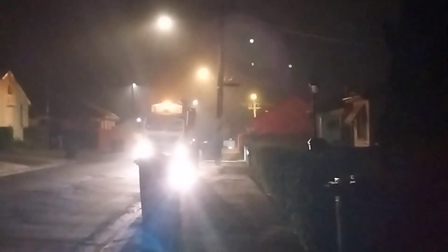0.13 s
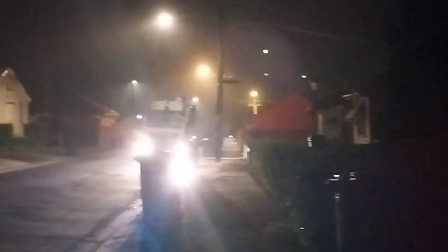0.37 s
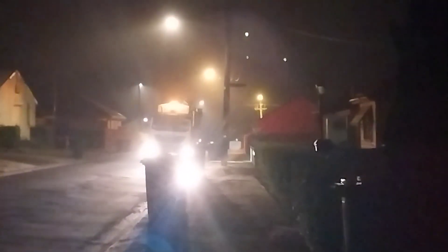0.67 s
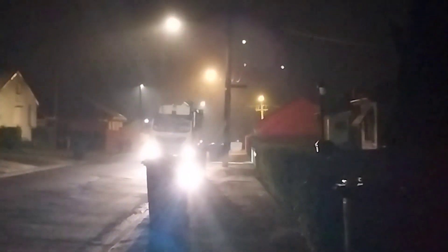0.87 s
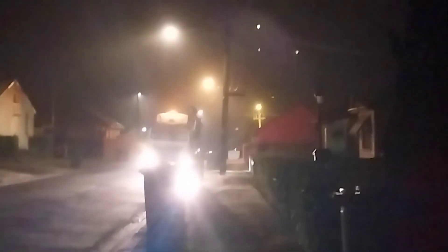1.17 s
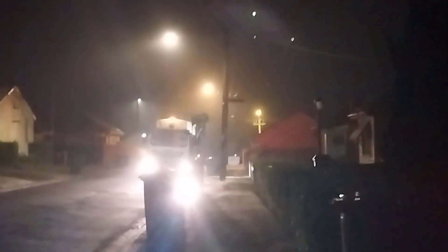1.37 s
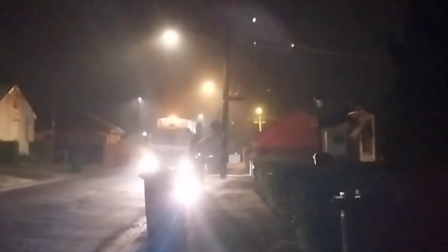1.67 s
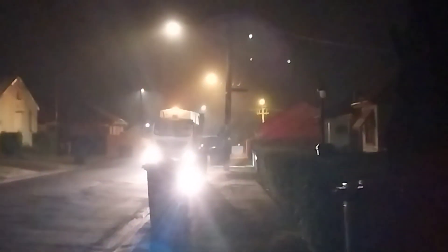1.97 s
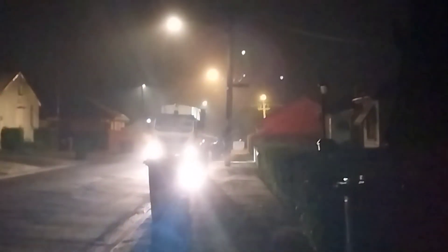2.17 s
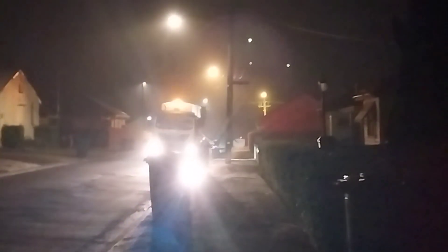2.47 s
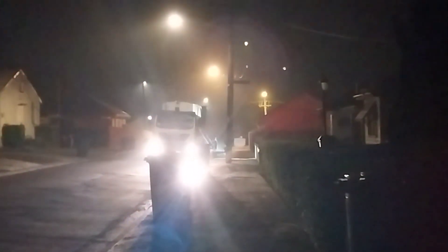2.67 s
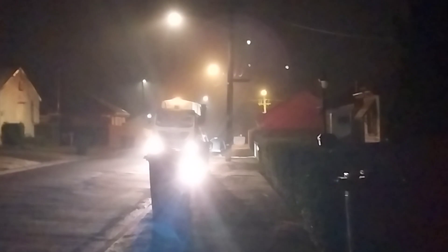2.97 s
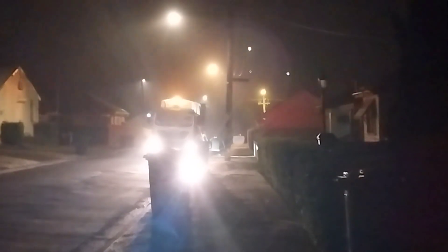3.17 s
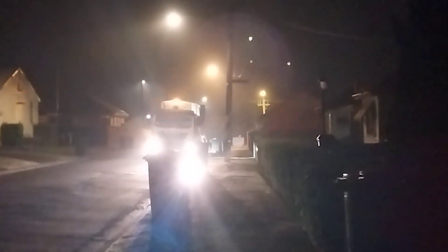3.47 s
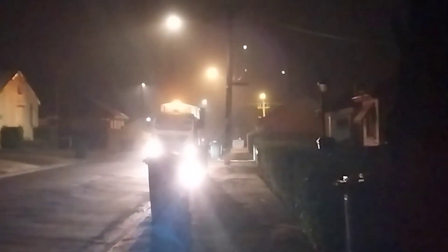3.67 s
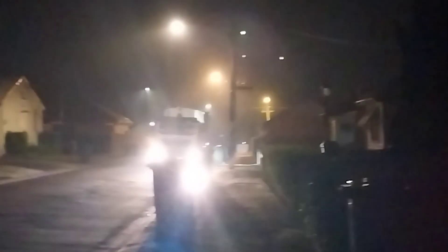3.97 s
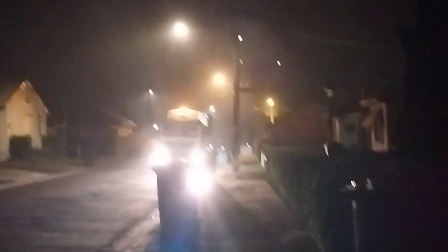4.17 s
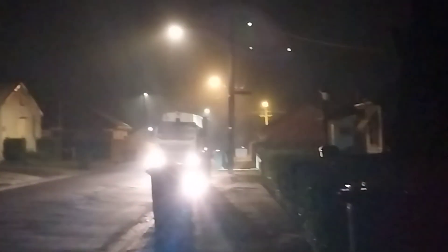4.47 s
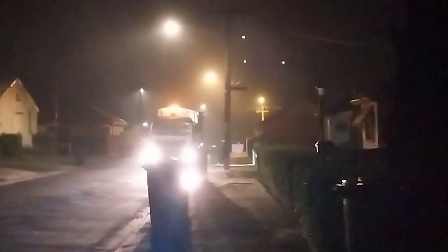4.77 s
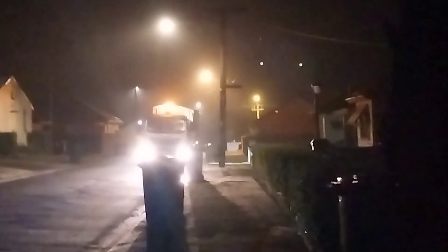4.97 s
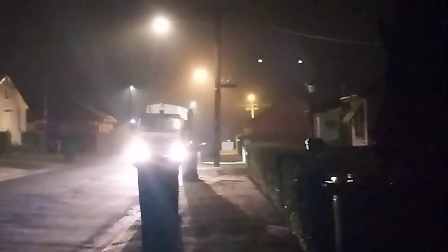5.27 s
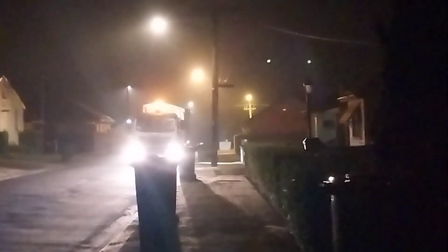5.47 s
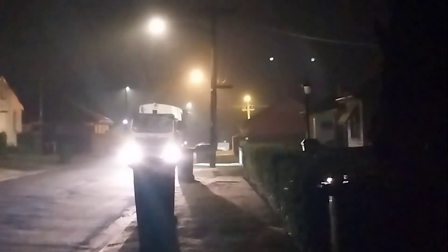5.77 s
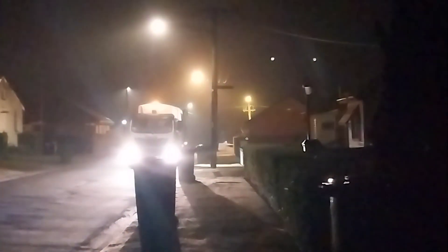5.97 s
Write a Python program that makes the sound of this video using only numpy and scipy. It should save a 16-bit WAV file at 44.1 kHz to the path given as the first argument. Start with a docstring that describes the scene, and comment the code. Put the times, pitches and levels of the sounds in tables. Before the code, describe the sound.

A garbage truck idles some way down a street, its diesel rumbling and clattering. The lift knocks a bin against the steel hopper in a quick run of booms, clanks and rattles. A pump hums through a few more knocks, ending in the loudest bang. The air brake gives a short hiss, and the engine revs up with a faint rising turbo whistle. House fronts add a brief echo.

```python
"""Night street, a refuse truck some way off. Its six-cylinder diesel idles: exhaust tones over rumble,
clatter and hiss. The lift bangs bins against the steel hopper; panels boom, the arm rings, loose parts
rattle, the pump hums. The air brake vents, the engine revs up and its turbo whistles.
Far traffic lies underneath; house fronts echo it all."""
import sys
import numpy as np
from scipy import signal
from scipy.fft import rfft, irfft, next_fast_len
from scipy.io import wavfile
from scipy.ndimage import uniform_filter1d

SR = 44100
rng = np.random.default_rng(int(sys.argv[2]) if len(sys.argv) > 2 else 0)


def bounce(signal):
    """Save signal as a 16-bit WAV file at the path given by the first command-line argument."""
    frames = np.transpose(np.atleast_2d(signal))
    limited = np.clip(frames, -1, 1)
    pcm = np.round(limited * 32767).astype(np.int16)
    wavfile.write(sys.argv[1], SR, pcm)


N = 269451

# engine speed (time [s], firing rate [Hz])
FIRING_RATE = [(0, 43.75), (1.3, 42.61), (3.85, 42.23), (4.16, 45.86), (4.51, 61.76), (4.69, 66.75),
               (4.99, 73.45), (5.22, 75.84), (5.59, 80.56), (6.11, 89.72)]
# exhaust orders 1-3 (idle level [dB], rise with speed [dB/oct])
EXHAUST_ORDERS = [(-42, 15), (-58, 30), (-44.5, 22)]
# pipe and street lift or cancel those orders (frequency [Hz], gain [dB])
PIPE_RESPONSE = [(45, 0), (61.5, 1.5), (64.8, -13), (68, 0.1), (72, 4), (78, -6), (82, -14), (86, -3),
                 (92, 0.1), (130, 0.1), (142, -7), (165, -8), (180, -3), (187, -6), (192, 8), (199, 7),
                 (204, -6), (210, -2), (218, 3), (226, -1), (231, -10), (237, 3), (249, 7), (256, 4),
                 (259.5, -7), (265, 2.5)]
# rumble, clatter, hiss, top hiss (idle level [dB], rise with speed [dB/oct], share of the swell [-])
ENGINE_LAYERS = [(-41, 12, 1.35), (-44, 8, 0.83), (-55.5, 8.5, 0.9), (-74, 11, 0.79)]
# swell and dip of the engine's rumble, clatter and hiss (time [s], gain [dB])
NOISE_SWELL = [(0, 1.7), (.44, 4), (1.05, 1.3), (2.9, 2.3), (3.52, -1), (4.17, -0.5), (4.32, 0.5), (4.7, 1)]
# clatter spectrum (frequency [Hz], density [dB])
CLATTER_SPECTRUM = [(190, -32), (330, -6), (409, -15.5), (476, -7.5), (525, -9.5), (706, -4), (948, -14.5),
                    (1060, -7.5), (1250, -14), (1380, -14), (1610, -11), (1810, -18.5), (2070, -16),
                    (2800, -27), (3640, -42), (6160, -120)]
# engine casing modes (frequency [Hz], decay rate [1/s], level [dB])
CASING_MODES = [(571.6, 31, 0.5), (745, 6.9, 0.5), (1063, 28, -6), (1234, 23, -0.5), (1680, 150, -3)]
# engine airflow spectrum (frequency [Hz], density [dB])
HISS_SPECTRUM = [(1530, -24), (2600, -1.5), (3300, -4.5), (3670, -2), (4660, -1.5), (4840, -3.5),
                 (5260, -0.5), (5880, -7), (7200, -12.5), (8740, -21.5), (10600, -28), (12800, -26),
                 (13800, -31.5), (15600, -42)]
# bin blows (time [s], boom [dB], boom tilt [dB/oct], clank [dB], clank pitch [Hz], crack [dB],
# rattle [dB])
BIN_BLOWS = [(0.09, -26, -15, -31, 740, -47, -52), (0.213, -23, -1, -32.5, 850, -49, -40.5),
             (0.254, -20, 9.5, -33, 1140, -43, -43), (0.275, -27, 10, -29.5, 1650, -48, -39),
             (0.312, -20.5, -9, -40, 2150, -53, -40.5), (0.415, -39, 10, -34, 1700, -42, -38),
             (0.434, -22, -6, -40, 745, -60, -58), (0.519, -20.5, 4, -35, 1090, -50, -45),
             (0.595, -29.5, -1, -33.5, 2150, -42, -36), (0.662, -24.5, 11, -46, 1085, -60, -58),
             (0.722, -31, 0, -34, 744, -44, -44), (0.752, -30, 2, -50, 742, -62, -55),
             (1.201, -34, 7, -23, 890, -44.5, -40), (1.267, -34, -3, -43, 745, -54, -44),
             (1.782, -27, 18, -38, 2150, -46, -39), (2.203, -23.5, -9, -37, 1270, -62, -44),
             (2.21, -24, -4, -24.5, 1890, -34, -37), (2.221, -22.5, 13, -28, 1760, -50, -52),
             (2.272, -25.5, 9, -46, 755, -62, -39.5), (3.029, -24, -8, -33, 1240, -59, -43.5),
             (3.061, -13.5, -7, -38, 1240, -46.5, -37.5), (3.093, -1.5, 6, -26, 1210, -41.5, -31.5),
             (3.149, -17, 2, -36, 740, -72, -59), (3.197, -11.5, 6, -40, 750, -47.5, -40.5),
             (3.255, -20, 3, -49, 1610, -61, -51), (3.3, -22, -8, -56, 1610, -65, -54),
             (3.419, -26, -7, -43, 1610, -53, -57), (3.726, -29.5, 17.5, -35, 1440, -46, -42),
             (4.082, -31, -6, -39, 740, -66, -44), (4.209, -39, -3, -45, 1250, -59, -43.5),
             (4.282, -28, -6, -37, 740, -48, -48), (4.327, -40.5, 1, -44, 1250, -48, -62),
             (4.363, -27, 26, -33.5, 1600, -43, -44.5)]
# hopper panel modes (frequency [Hz], level [dB], t60 [s])
HOPPER_MODES = [(55.5, -13, 0.35), (85, -34.5, 0.26), (104.3, -10, 0.96), (120.2, 2.5, 0.4),
                (137.3, -7, 0.95), (172.3, -3, 0.73), (209.6, 0.5, 0.15), (226.6, -3.5, 0.31),
                (240.6, -2, 0.096), (277.5, -12, 0.23), (401, -19, 0.1), (468, -17, 0.079),
                (515, -25, 0.068)]
# steel lift arm modes (frequency [Hz], level [dB], t60 [s])
ARM_MODES = [(740, -8, .07), (888, 2, .08), (1090, 3, .07), (1253, -3, .1), (1620, 1, .11), (1760, -4, .07),
             (2150, 0, .09), (2320, -5, .06), (2930, -13, .08), (3580, -13, .06), (4130, -11, .08)]
# brake vent, then a short spit (time [s], level [dB], opening [s], hold [s], fall [dB/s],
# low edge [Hz], high edge [Hz])
BRAKE_VENTS = [(3.572, -46.5, 0.039, 0.083, 85, 3200, 17000), (4.352, -58.5, .008, .005, 598, 11000, 13400)]
# brake air spectrum (frequency [Hz], density [dB])
VENT_SPECTRUM = [(1760, -47), (3000, -12), (4060, -0.5), (4570, -3), (4960, 2.5), (6270, -5), (7850, -3.5),
                 (8200, -9.5), (10700, -14), (11100, -4.5), (12900, -6.5), (14000, -14), (15600, -13)]
# turbo spool-up (time [s], pitch [Hz])
TURBO_PITCH = [(4.3, 6500), (4.9, 9350), (5.2, 10800), (5.55, 11900), (6.11, 14250)]
# echo spectrum (frequency [Hz], side minus mid [dB])
ECHO_WIDTH = [(60, -18), (200, -20), (400, -14.5), (700, -10), (1290, -4), (2380, -0.5), (4400, -2.5),
              (8120, 0.5), (15000, 0)]
# stereo balance (frequency [Hz], left minus right [dB])
BALANCE = [(60, 1), (110, -1), (200, -1), (380, -1), (700, -1), (1290, -5), (2380, 1), (4400, -1.5),
           (8120, -0.5), (15000, -3.5)]

IDLE_HZ = 42.5
CLANK_CONTACT_S, OFF_PITCH_MAX_DB = 0.0035, 9.5
RATTLE_RISE_S, RATTLE_FALL_S = 0.0032, 0.056
SHUDDER_RE_BOOM_DB, SHUDDER_RISE_S, SHUDDER_FALL_S = -15, 0.011, 0.089
PUMP_HZ, PUMP_DB, PUMP_ON_S, PUMP_OFF_S, PUMP_RAMP_S = 141.1, -40.5, 1.76, 3.2, 0.27
SEEP_DB, SEEP_FALL_DB_S = -23.5, 33
TURBO_DB, TURBO_LOUDEST_HZ, TURBO_FALL_DB_OCT = -67.5, 11700, 33
LOW_CUT_HZ, HIGH_CUT_HZ = 35, 15740


def undb(db):
    """Decibels to gain."""
    return 10 ** (np.asarray(db) / 20)


def peak(x):
    """Scale to peak 1."""
    return x / np.abs(x).max()


def curve(table):
    """A (time, value) table, one value a sample."""
    return np.interp(np.arange(N) / SR, *np.transpose(table))


def colour(x, table):
    """Filter by (frequency [Hz], gain [dB]) points on a log axis."""
    hz, db = np.transpose(table)
    mirrored_end = (2 * x[-1] - x[-2:-4098:-1]) * np.hanning(8192)[4096:]
    size = next_fast_len(N + SR // 4)
    bin_hz = np.arange(size // 2 + 1) * SR / size
    gain = undb(np.interp(np.log(bin_hz + 1), np.log(hz + 1), db))
    return irfft(rfft(np.concatenate([x, mirrored_end]), size) * gain, size)[:N]


def band(x, lo_hz, hi_hz):
    """Band-pass, scaled to rms 1."""
    sos = signal.butter(3, [lo_hz, min(hi_hz, 0.45 * SR)], "band", fs=SR, output="sos")
    y = signal.sosfilt(sos, x)
    return y / np.sqrt(np.mean(y ** 2))


def ring(x, hz, t60_s):
    """One decaying mode driven by x."""
    pole = np.exp(2j * np.pi * hz / SR - np.log(1000) / (t60_s * SR))
    return signal.lfilter([1], [1, -pole], x).imag


def walk(rate_hz):
    """Random steps, smoothed twice."""
    hold = int(SR / rate_hz)
    steps = np.repeat(rng.standard_normal(N // hold + 1), hold)
    return 1.27 * uniform_filter1d(uniform_filter1d(steps, hold), hold)[:N]


def tone(hz, rms_db):
    """Sine on a moving pitch."""
    return np.sqrt(2) * undb(rms_db) * np.sin(2 * np.pi * np.cumsum(hz) / SR)


def exhaust(firing_hz, speed_oct, rumble_db, clatter_db):
    """Firing harmonics sweep through the pipe response; unequal cylinders add weak half orders."""
    out = 0
    for order, (idle_db, rise_db_oct) in enumerate(EXHAUST_ORDERS, 1):
        hz = order * firing_hz
        pipe_db = np.interp(hz, *np.transpose(PIPE_RESPONSE))
        out += tone(hz, idle_db + rise_db_oct * speed_oct + pipe_db + 0.72 * walk(10))
    for order in (1.5, 2.5):
        out += tone(order * firing_hz, rumble_db - 17.5 + 3 * walk(8))
    return out + tone(6 * firing_hz, clatter_db - 13 + 3 * walk(8))  # shows under load


def engine():
    """Diesel: exhaust, body rumble, and casing clatter and air hiss that puff once a firing."""
    firing_hz, swell_db = curve(FIRING_RATE), curve(NOISE_SWELL)
    speed_oct = np.log2(firing_hz / IDLE_HZ)
    rumble_db, clatter_db, hiss_db, top_db = (
        idle_db + rise_db_oct * speed_oct + share * swell_db
        for idle_db, rise_db_oct, share in ENGINE_LAYERS)
    tones = exhaust(firing_hz, speed_oct, rumble_db, clatter_db)
    firing_phase = np.cumsum(firing_hz) / SR % 1
    puff = 0.83 + 0.21 * np.exp(-firing_phase / 0.34)
    casing = sum(undb(db) * ring(rng.standard_normal(N), hz, 6.9 / decay) * np.sqrt(decay)
                 for hz, decay, db in CASING_MODES)
    waver_db = 0.5 * walk(5.3)
    noise = rng.standard_normal(N)

    deep = band(noise, 74.3, 113.6) * undb(-6.5 - 2.2 * speed_oct)
    growl = band(noise, 300, 350.5) * undb(-15.5 + 4.2 * speed_oct)
    rumble = deep + band(noise, 139.5, 256.2) + growl
    rumble *= np.hypot(undb(rumble_db), body_shudder()) * undb(1.2 * walk(28))

    clatter = band(colour(rng.standard_normal(N), CLATTER_SPECTRUM), 205, 4200)
    clatter += 0.47 * band(casing, 380, 2900)
    clatter += band(noise, 442, 820) * undb(-22.5 + 16.3 * speed_oct)  # block growls under load
    clatter *= puff * undb(clatter_db + waver_db)

    air = colour(rng.standard_normal(N), HISS_SPECTRUM)
    hiss = band(air, 2870, 10260) * undb(hiss_db) + band(air, 9880, 21000) * undb(top_db)
    hiss *= puff * undb(waver_db + 0.5 * walk(31))
    return tones + rumble + clatter + hiss


def far_traffic():
    """Steady low rumble of distant traffic."""
    return band(rng.standard_normal(N), 25, 65) * undb(-53.5)


def hopper_boom(t, noise, tilt_db_oct):
    """A bin hits the panels; its shaking load keeps them going."""
    load = 0.7 * noise * (1 - np.exp(-t / 0.006)) * np.exp(-t / 0.077)
    shove = load - 2 * np.exp(-((t - 0.006) / 0.0026) ** 2)  # slow push on the large panels
    rim_chatter = load - sum(size * np.exp(-((t - at_s) / 0.00061) ** 2)
                             for at_s, size in ((0.002, 2.4), (0.0062, 3), (0.0104, 0.76)))
    boom = 0
    for hz, db, t60_s in HOPPER_MODES:
        spot_db = 2 * rng.standard_normal() + tilt_db_oct * np.log2(hz / 170)  # each lands elsewhere
        boom += undb(db + spot_db) * ring(rim_chatter if hz > 160 else shove, hz, t60_s)
    return peak(band(boom, 63, 600))  # panels radiate no deep bass


def arm_clank(t, noise, pitch_hz):
    """Brief contact rings the steel arm, favouring modes near the struck part's pitch."""
    scrape = (noise * t * np.exp(-t / CLANK_CONTACT_S))[:SR // 5]
    clank = 0
    for hz, db, t60_s in ARM_MODES:
        off_pitch_db = min(45 * abs(np.log2(hz / pitch_hz)), OFF_PITCH_MAX_DB)
        clank += undb(db - off_pitch_db) * peak(ring(band(scrape, 0.7 * hz, 1.4 * hz), hz, t60_s))
    return peak(clank)


def bin_blows():
    """Each blow booms, clanks, cracks and sets loose parts rattling."""
    out = np.zeros(N + SR)
    t = np.arange(SR // 2) / SR
    crack_rise = 1 - np.exp(-(t / 0.003) ** 2)  # blurred by distance
    crack_fall = np.exp(-t / 0.006) + 0.25 * np.exp(-t / 0.07)
    rattle_shape = (1 - np.exp(-t / RATTLE_RISE_S)) * np.exp(-t / RATTLE_FALL_S)
    for at_s, boom_db, tilt_db_oct, clank_db, clank_hz, crack_db, rattle_db in BIN_BLOWS:
        load, contact, snap, loose = rng.standard_normal((4, len(t)))
        boom = undb(boom_db) * hopper_boom(t, load, tilt_db_oct)
        clank = undb(clank_db) * arm_clank(t, contact, clank_hz)
        crack = band(snap, 3700, 6300) + 0.11 * band(snap, 7000, 13500)
        crack *= undb(crack_db) * crack_rise * crack_fall
        rattle = undb(rattle_db) * band(loose, 600, 2080) * rattle_shape
        start = int(at_s * SR)
        out[start:start + len(clank)] += clank
        out[start:start + len(t)] += boom + crack + rattle
    return out[:N]


def body_shudder():
    """Envelope of the truck body's rumble after each blow."""
    t = np.arange(0, N + 100, 100) / SR
    at_s, boom_db = np.transpose(BIN_BLOWS)[:2, :, None]
    age_s = np.clip(t - at_s, 0, None)
    shape = (1 - np.exp(-age_s / SHUDDER_RISE_S)) * np.exp(-age_s / SHUDDER_FALL_S)
    level = np.linalg.norm(undb(boom_db + SHUDDER_RE_BOOM_DB) * shape, axis=0)
    return np.interp(np.arange(N) / SR, t, level)


def lift_pump():
    """The pump hums at one pitch, ramping in and out."""
    t = np.arange(N) / SR
    running = np.clip(np.minimum(t - PUMP_ON_S, PUMP_OFF_S + PUMP_RAMP_S - t) / PUMP_RAMP_S, 0, 1)
    return tone(np.full(N, PUMP_HZ), PUMP_DB) * running


def air_brake():
    """The valve snaps open; air rushes, dies away, and the last of it seeps out."""
    air = colour(rng.standard_normal(N), VENT_SPECTRUM) * undb(0.97 * walk(30))
    out = 0
    for at_s, db, open_s, hold_s, fall_db_s, lo_hz, hi_hz in BRAKE_VENTS:
        age_s = np.arange(N) / SR - at_s
        opening = np.clip(age_s / open_s, 0, 1)
        closing_s = np.clip(age_s - open_s - hold_s, 0, None)
        fall = undb(-fall_db_s * closing_s) + undb(SEEP_DB - SEEP_FALL_DB_S * closing_s)
        out += undb(db) * band(air, lo_hz, hi_hz) * opening * fall
    return out


def turbo():
    """Breathy, patchy whistle that climbs as the turbo spools up."""
    hz = curve(TURBO_PITCH)
    db = TURBO_DB - TURBO_FALL_DB_OCT * np.abs(np.log2(hz / TURBO_LOUDEST_HZ))
    whistle = tone(hz * (1 + 0.008 * walk(25)), db + 1.5 * walk(20))
    return whistle * walk(1500)  # spreads the tone into a band


def scene():
    """Truck and traffic; house fronts scatter echoes that differ left and right, mostly in the treble."""
    mid = engine() + far_traffic() + turbo() + bin_blows() + lift_pump() + air_brake()
    t = np.arange(SR // 2) / SR
    echoes = rng.standard_normal(len(t)) * np.exp(-t / 0.029)
    echoes /= np.linalg.norm(echoes)
    side = colour(signal.fftconvolve(mid, echoes)[:N], ECHO_WIDTH)
    left = colour(mid + side, np.array(BALANCE) * [1, 0.5])
    right = colour(mid - side, np.array(BALANCE) * [1, -0.5])
    return np.array([left, right])


def record(dry):
    """Microphone: low cut, soft clip, steep high cut; the sound fades out over its last 4 ms."""
    low_cut = signal.butter(6, LOW_CUT_HZ, "high", fs=SR, output="sos")
    high_cut = signal.ellip(14, 0.3, 70, HIGH_CUT_HZ, fs=SR, output="sos")
    clipped = 1.6 * np.tanh(signal.sosfilt(low_cut, dry) / 1.6)
    fade = np.sin(np.pi / 2 * np.clip(np.arange(N)[::-1] / (0.004 * SR), 0, 1)) ** 2
    return signal.sosfilt(high_cut, clipped * fade)


dry = scene()
out = record(dry)
bounce(out)
```